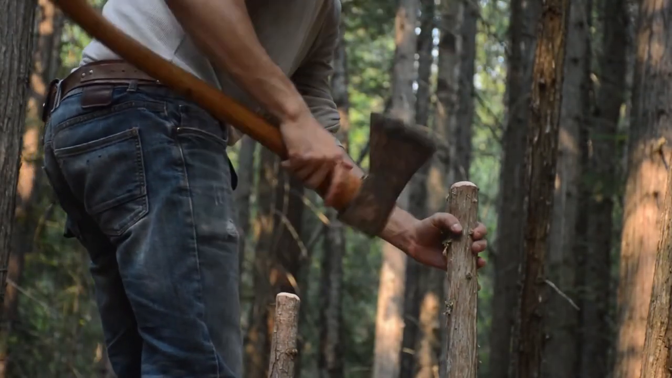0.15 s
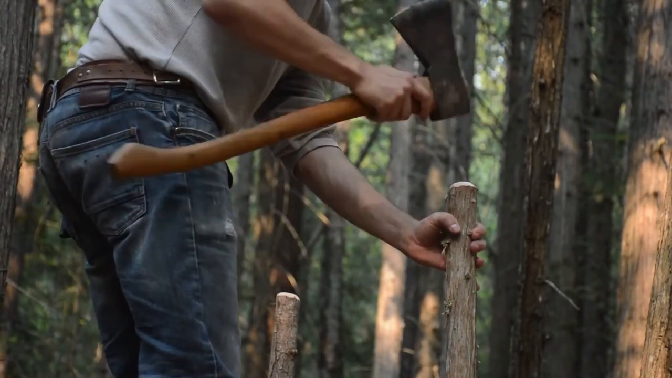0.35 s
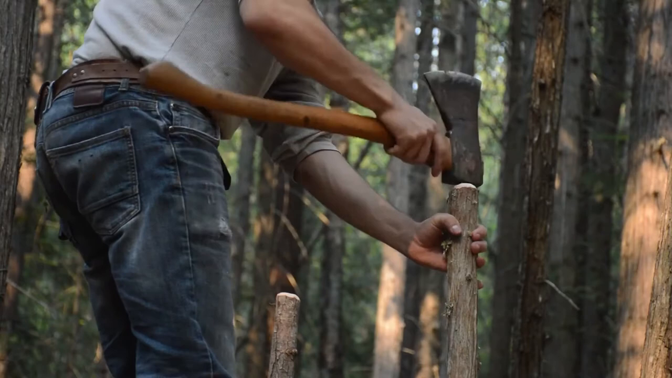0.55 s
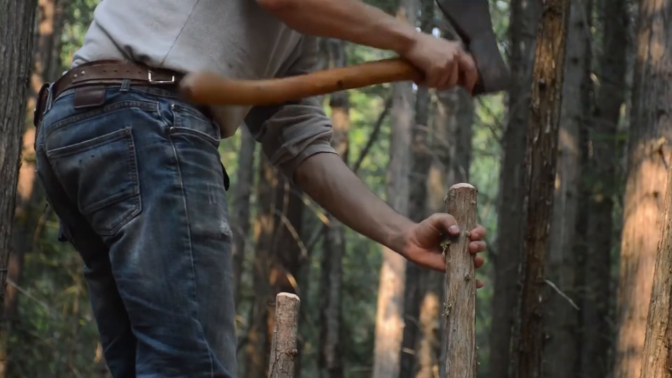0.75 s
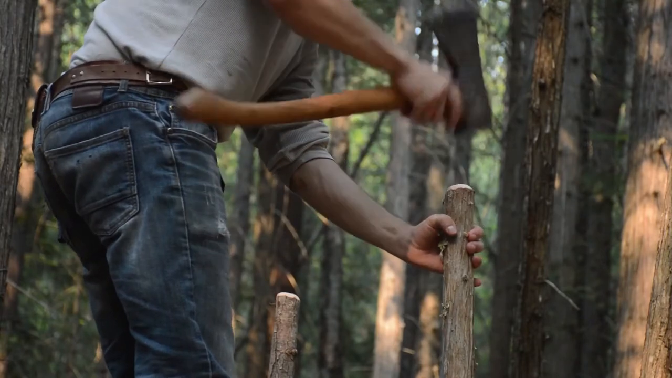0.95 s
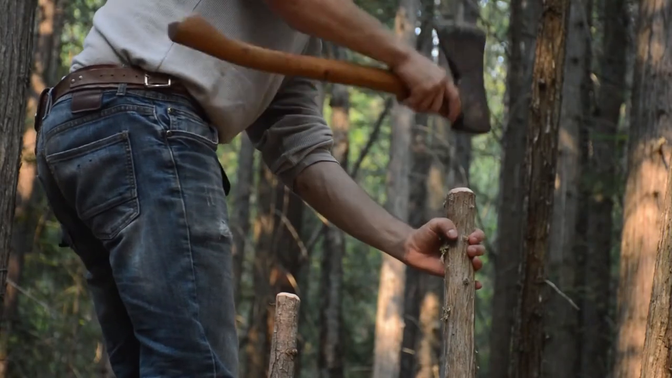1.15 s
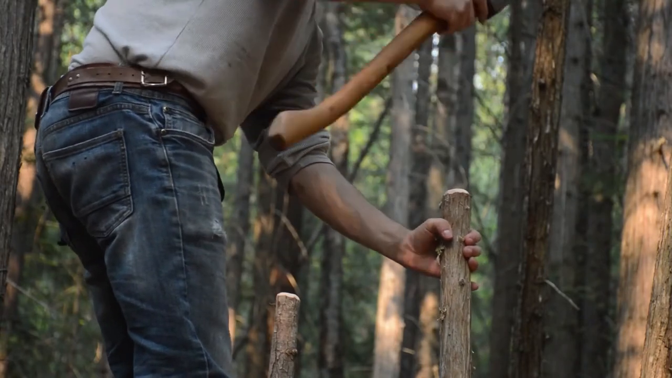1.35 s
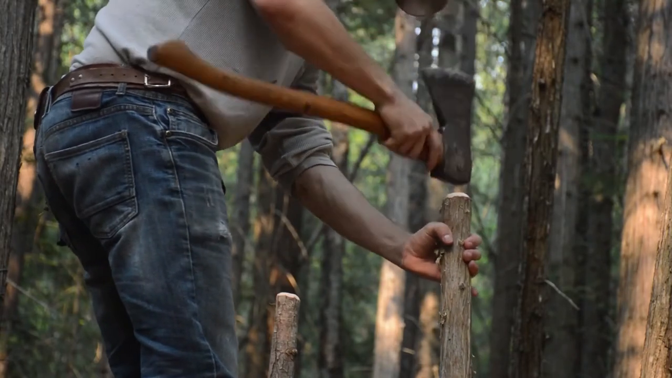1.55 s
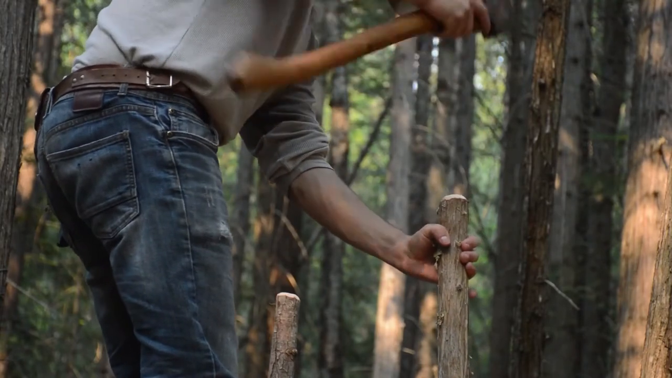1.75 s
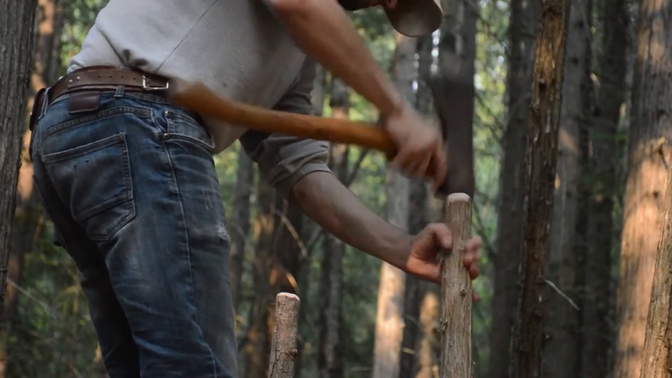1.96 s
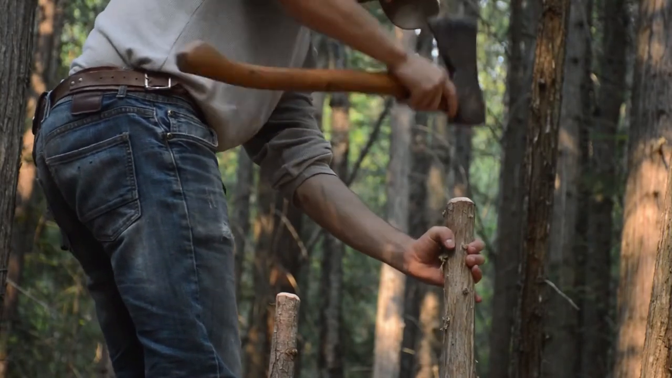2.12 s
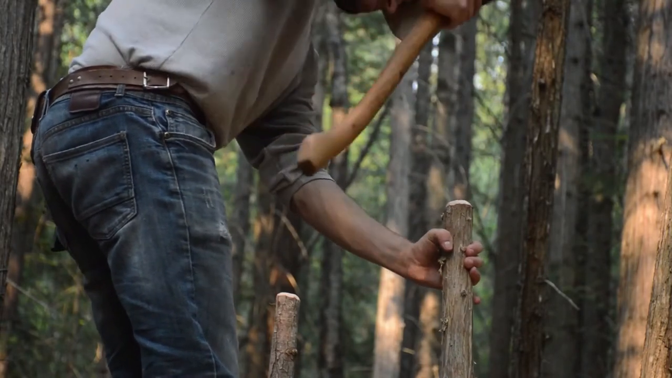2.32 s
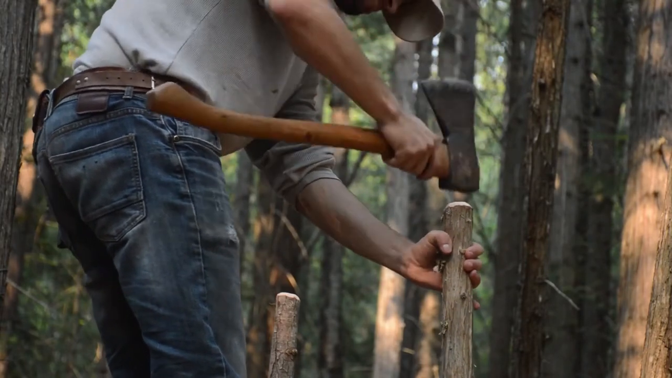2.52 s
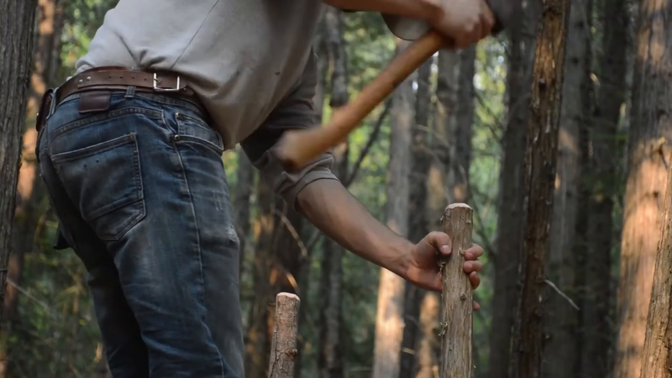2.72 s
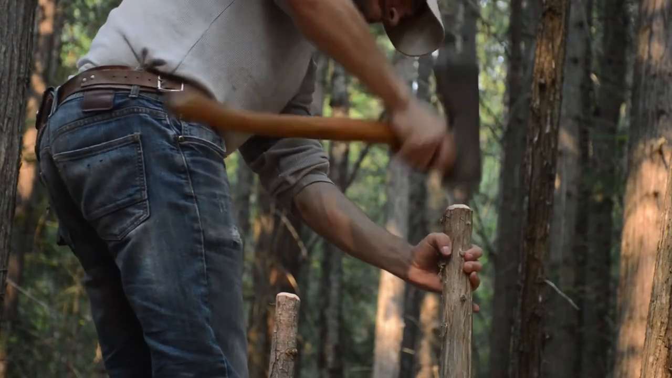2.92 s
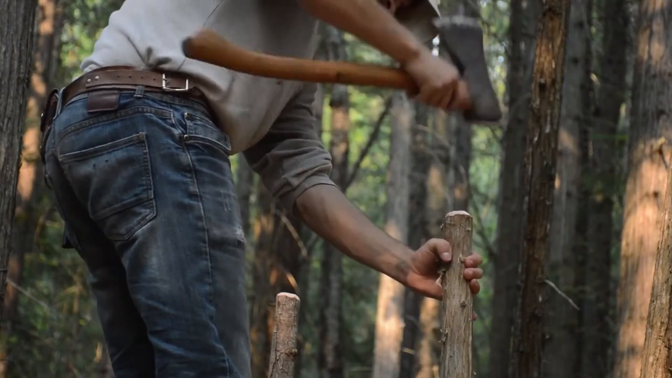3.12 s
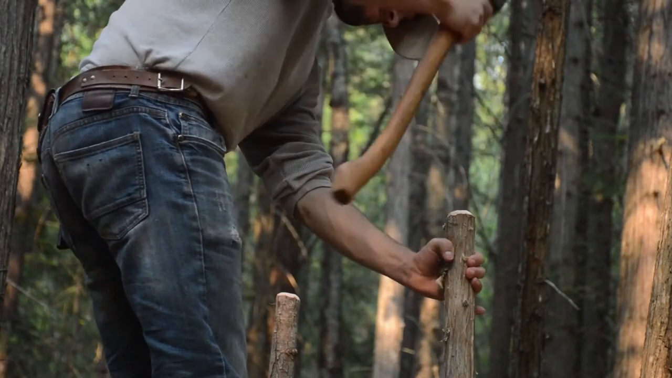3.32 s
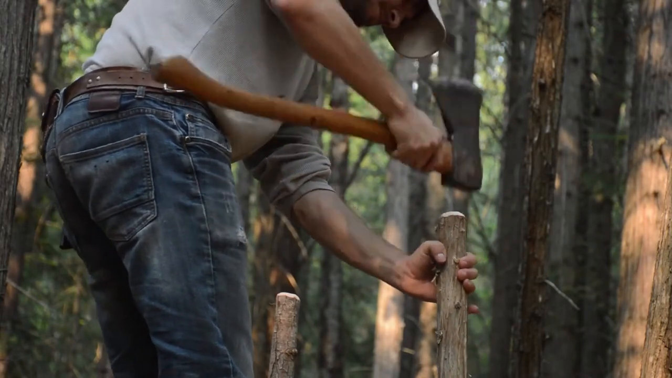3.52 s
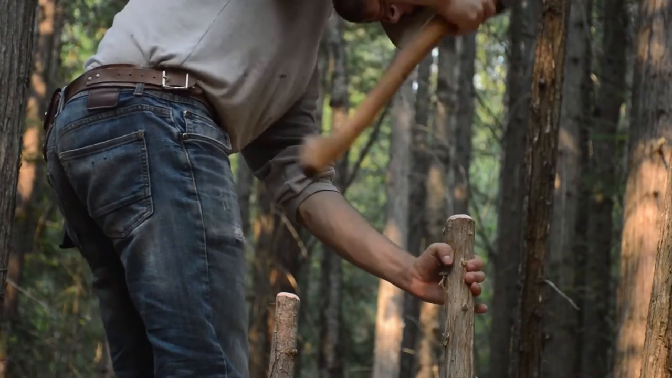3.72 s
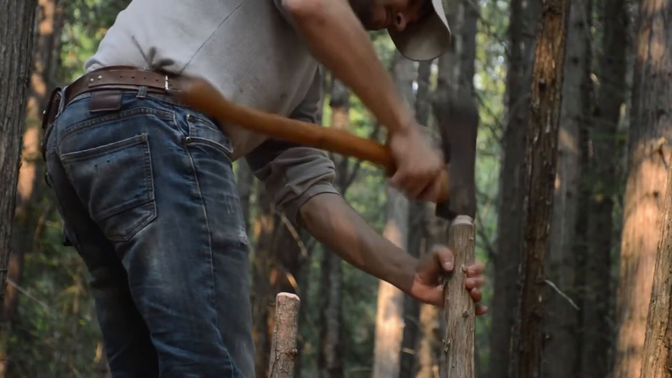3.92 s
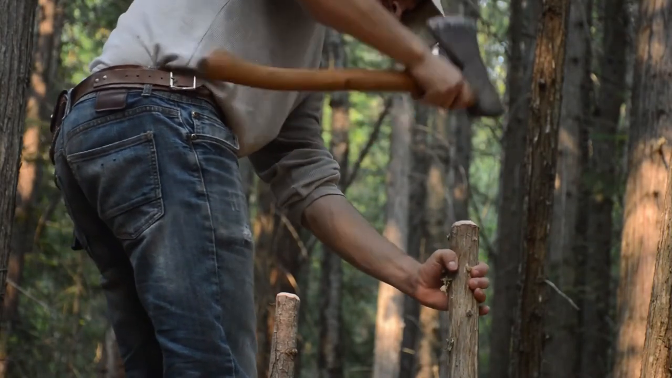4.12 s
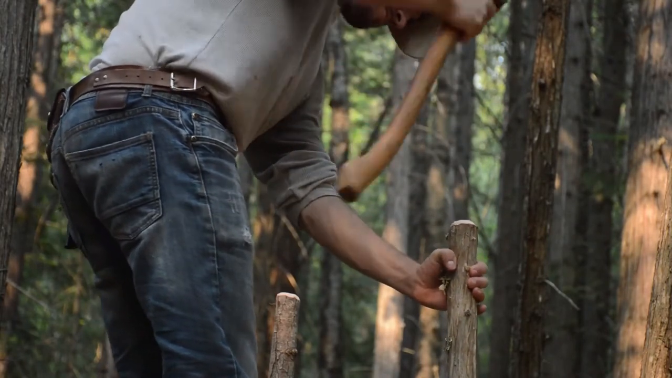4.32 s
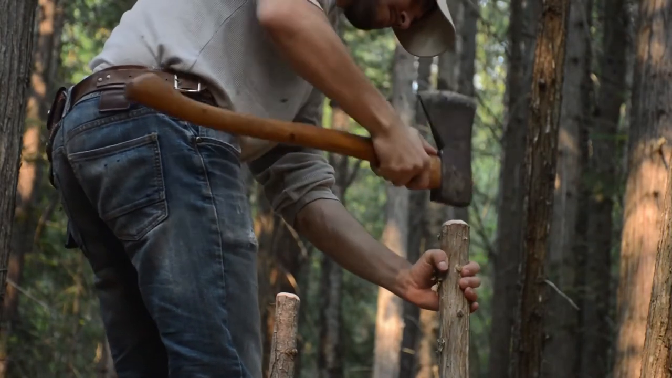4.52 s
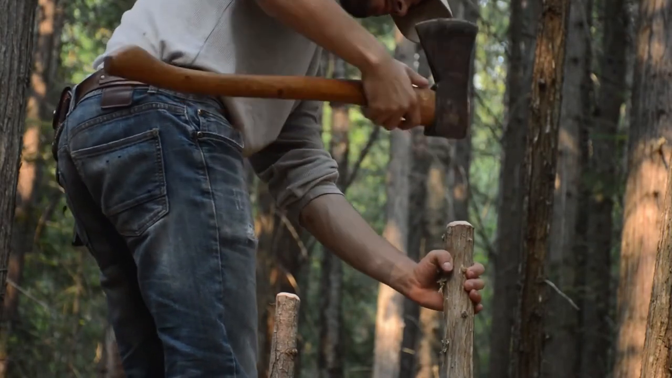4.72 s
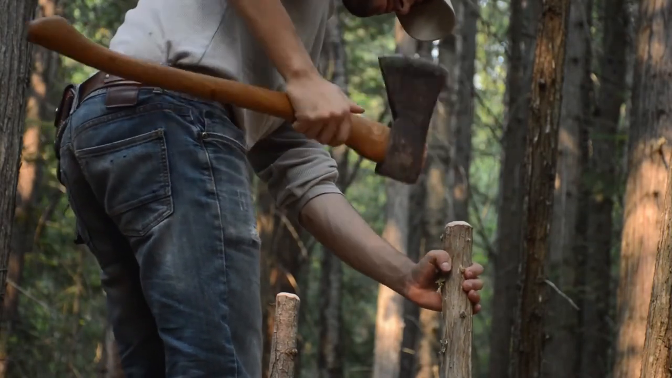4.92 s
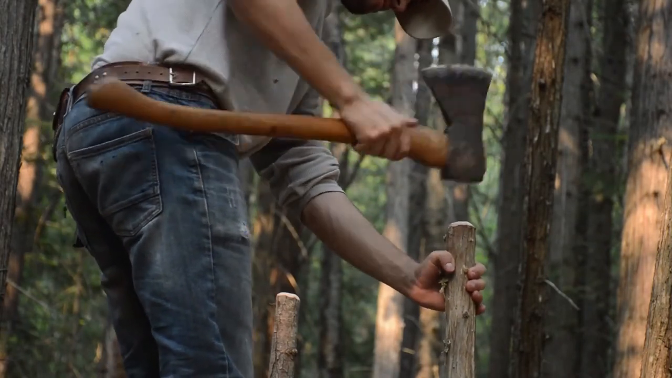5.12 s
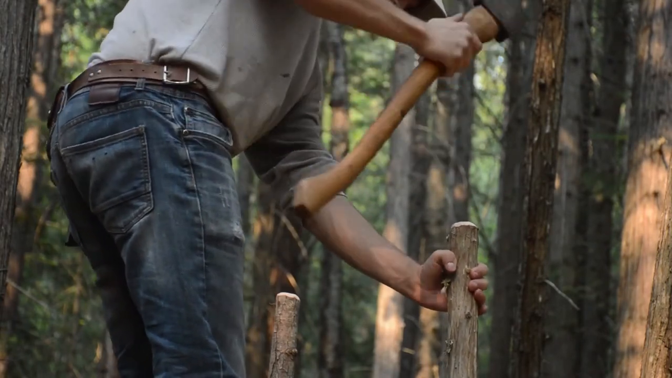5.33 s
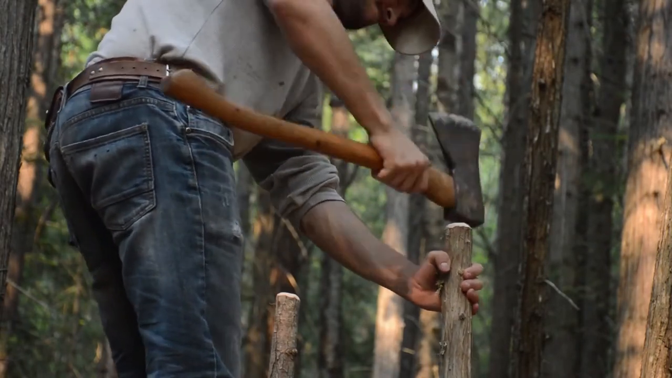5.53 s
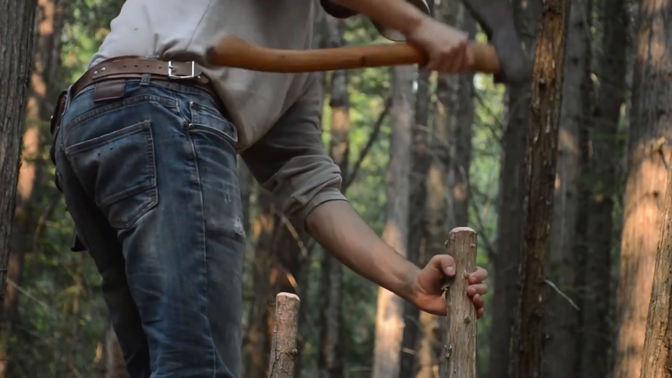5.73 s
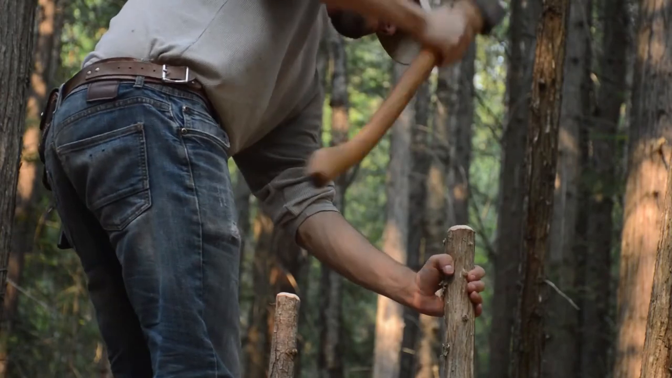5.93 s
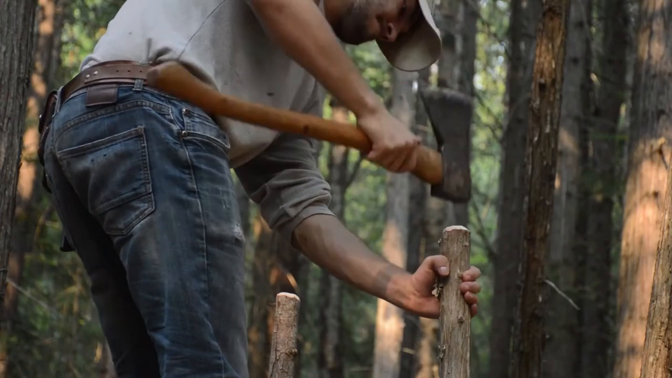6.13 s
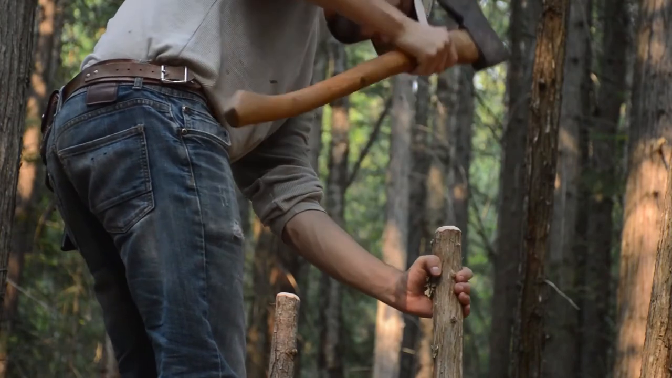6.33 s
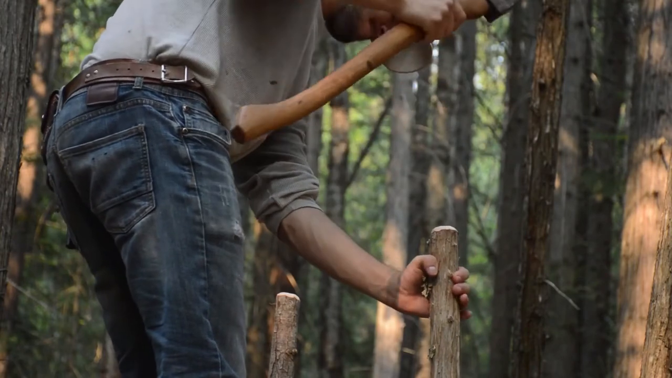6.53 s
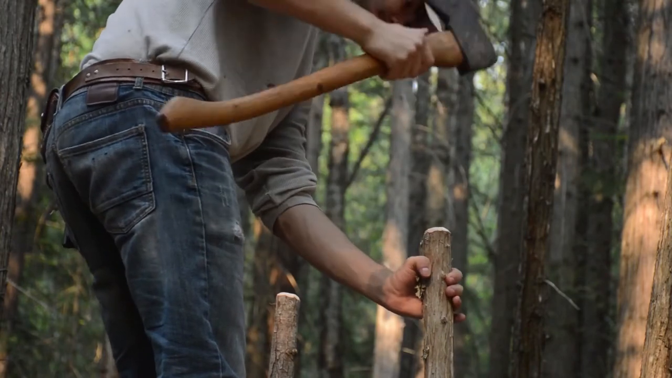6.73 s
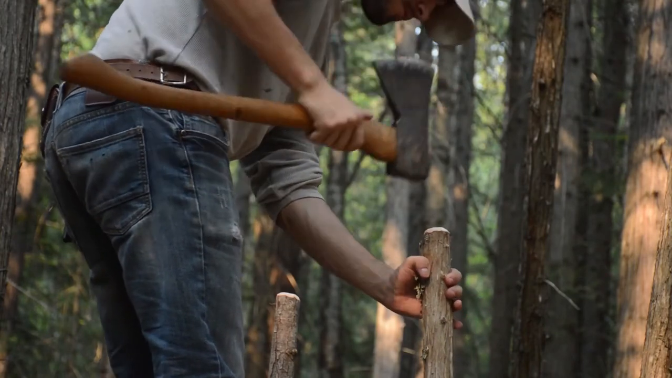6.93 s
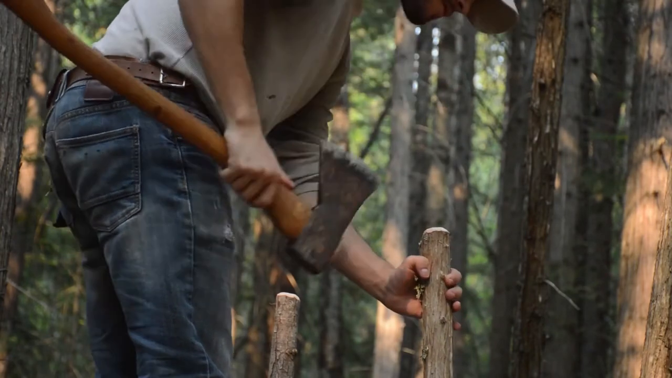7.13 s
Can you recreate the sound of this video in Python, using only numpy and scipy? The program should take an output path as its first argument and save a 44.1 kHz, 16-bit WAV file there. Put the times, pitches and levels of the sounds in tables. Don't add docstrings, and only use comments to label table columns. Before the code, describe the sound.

Close, overloaded woody whacks of axe steel on a stake, about two per second, a brief pause with light clicks, then two more blows.

```python
import sys
import numpy as np
from scipy import signal
from scipy.fft import rfft, irfft
from scipy.io import wavfile
from scipy.ndimage import map_coordinates

SR = 44100
rng = np.random.default_rng(int(sys.argv[2]) if len(sys.argv) > 2 else 0)


def inscribe(sig):
    pcm = np.round(np.clip(np.atleast_2d(sig).T, -1, 1) * 32767)
    wavfile.write(sys.argv[1], SR, pcm.astype(np.int16))


def volts_from_decibels(level):
    exponent = np.asarray(level, float) / 20
    return 10 ** exponent


N = 315756
T = np.arange(SR) / SR

# start_s, force_db, crack_db, soil_push_db, bark_wash_db
BLOWS = [(0.61, -2.5, -14, -9, -13), (1.0827, 3.5, -9.5, -5, -9), (1.572, 4.5, -0.5, 0, -2),
         (2.0551, 1, -1.5, 4.5, -6), (2.5301, 2.5, -5, -3.5, -5.5), (3.0307, 3.5, 0.5, 3, 0),
         (3.5271, 3, -3.5, -2.5, -3.5), (4.0228, 6, -7.5, 1.5, -3), (4.5394, 0.5, -4, 5, -4),
         (5.5900, 1.5, -1.5, 3.5, -1), (6.1134, 3.5, -2, -11, 3)]
# off_centre_db, hardness_db, loose_grip_db, forest_ring_db
LANDING = [(10, -5.5, -1.7, 1), (-0.5, -4.5, 0.1, 1), (-2, 1, 3.2, 0.5), (1.5, 0.7, 3.5, 4),
           (2.5, -0.5, 5.5, 3), (-16.5, -1, 1, 4), (0.5, -.4, 0, 4), (-9, -0.75, -2, 1.5),
           (5, 3, -1.5, 0.8), (5, 2.5, -1, -2), (-5, -17, 1.5, 2)]
# rebound_start_s, chirp_peak_db, rebound_db, wash_tilt_db_per_octave
REBOUND = [(0.619, -5.5, -5, -1.5), (1.095, -0.5, -14, -1), (1.5849, -23.5, -25.5, -0.5),
           (2.0658, -25, -17, -1.3), (2.541, -25, -18, -1.5), (3.042, -26.5, -25.5, -.3),
           (3.5388, -12, -16, -1.7), (4.034, -20, -16.5, -2.1), (4.5513, -26, -15.5, -1),
           (5.6022, -18.5, -20, 0.3), (6.124, -21, -22, 2.1)]
# struck_spot_0_to_1, ring_db, sing_db, sing_t60_s, first_null_s
HEAD = [(.79, -6.5, -59, 0.54, .26), (.87, 2.5, -45, 0.9, 0.19), (.33, -10, -40, 1.26, .17),
        (.47, 8.5, -34.5, 1.03, 0.175), (.25, -1, -45.5, .9, 0.18), (.61, 3, -35, 1.03, 0.24),
        (.08, 6, -37, 1.04, 0.24), (.39, -1, -47.5, 1, 0.19), (.86, -6, -35.5, 1.04, 0.32),
        (.36, 3, -31.5, 1.37, 0.218), (.49, 11, -32, 1.13, 0.268)]

STAKE_HZ = [427, 650, 878, 945, 1210, 1420, 1690, 1787, 1975, 2200, 2450, 2690, 4000, 4480]
# level_db, t60_s, off_centre_db_per_db, hardness_db_per_db, loose_grip_db_per_db
STAKE_MODES = [(-19.5, 0.05, 0.88, 0.82, 0.5), (-11, 0.021, 0.58, -0.53, -0.23),
               (-2, 0.035, 0.22, 0.3, 0.38), (-0.5, 0.045, 0.1, -0.04, 0.07),
               (-26.5, 0.0044, 0.55, 5.3, -0.2), (-13.5, 0.026, 0.68, 1.12, -0.15),
               (-11, 0.076, -0.01, 0.3, 0.79), (-3, 0.022, 0.28, 0.67, 0.02),
               (-8.5, 0.025, 0.04, 0.9, -0.06), (-11, 0.031, 0.63, 1.26, 0.14),
               (-16, 0.02, -0.74, 2.3, -0.9), (-4.5, 0.012, 0.22, 1.77, 0.33),
               (-22.5, 0.026, -0.7, 4.8, -0.9), (-40, 0.029, -0.1, 5.3, 3.5)]
# freq_hz, level_db
CRACK_SPECTRUM = [(150, -4), (400, 0), (1000, -2.5), (2700, 1), (3600, -8), (5000, -13), (8000, -10),
                  (16000, -30)]
# freq_hz, level_db
SNAP_SPECTRUM = [(1500, -28.5), (3500, 6), (5500, -10), (7600, 2), (9000, -3.5), (11500, -9), (16000, -21)]

# freq_hz, level_db
WASH_SPECTRUM = [(200, -24), (600, -7), (1500, 4.5), (2500, -1.5), (4000, -3), (6500, -12.5), (10000, -9),
                 (16000, -41)]
# pitch_hz, width_hz, level_over_wash_db
LENGTHWISE = [(922, 58, 11.5), (1787, 51, 13.5), (2690, 170, 4.5), (4430, 38, -0.5), (5200, 44, 1),
              (6090, 450, 0.5), (7020, 92, -6), (9900, 50, -5)]
# freq_hz, t60_s
TRUNKS_DECAY = [(200, 1.2), (900, 1.234), (1800, 0.99), (3500, 0.91), (6000, 0.66), (10000, 0.49),
                (15000, 0.47)]
# freq_hz, t60_s
NEAR_DECAY = [(300, 0.2), (1000, 0.11), (4000, 0.079), (12000, 0.05)]

STEEL_HZ = [4806, 6350, 9112, 9911]
STEEL_HALF_WAVES = [1, 4, 3, 5]
# level_db, t60_s
STEEL_MODES = [(-30.5, 0.16), (-30.5, 0.15), (-40.5, .1), (-34.5, 0.11)]

# start_s, mode_db, pitch_hz, t60_s, click_db
TICKS = [
    (.151, -64, 8500, .01, -44),
    (5.071, -33, 1500, .02, -29),
    (5.078, -39, 2060, 0.08, -46),
    (5.1388, -28, 1200, 0.011, -44),
    (5.1445, -26, 7000, 0.028, -32),
    (5.1442, -48, 11350, 0.042, -43),
    (5.1460, -52, 7100, 0.3, -16),
    (5.1462, -60, 5500, .02, -34),
    (5.1388, -34, 540, .016, -48),
    (5.1462, -44, 2900, .012, -44),
]
# centre_s, level_db, spread_s
SLEEVE = [
    (4.85, -68, .11),
    (5.13, -59, .05),
]
# freq_hz, density_db_per_hz
HUSH_SPECTRUM = [(15, -51.5), (25, -15.5), (53, 0), (137, -5), (270, -10.5), (775, -8), (3160, -19),
                 (16000, -36)]
ENGINE_HZ = [110, 173, 223, 268]
ENGINE_DB = [-58.5, -66, -73, -67.5]
# time_s, level_db
ENGINE_FADE = [(0, 0.5), (1.499, -2), (4.3, -2), (5.4, -1.5), (7.16, -1.5)]

LEAD_S, CONTACT_S = 0.001027, 0.0035
SNAP_DB_PER_HARDNESS_DB = -0.35
THUD_DB_PER_OFF_CENTRE_DB = -0.26
SING_HZ, SING_SWELL_S = 3589, 0.033
SOIL_MIRROR = 0.52
NODE_LEAK = 0.03
CLICK_OCTAVES, CLICK_NARROWING = 0.99, 0.53


def unit(x):
    return x / np.sqrt(np.mean(x ** 2) + 1e-20)


def along(points, hz):
    f, v = np.transpose(points)
    return np.interp(np.log(hz + 1), np.log(f + 1), v)


def curve(knots_per_s):
    knots = rng.standard_normal(24)
    return map_coordinates(knots, [np.arange(N) * knots_per_s / SR])


def noise(spectrum, size):
    gain = volts_from_decibels(along(spectrum, np.fft.rfftfreq(size, 1 / SR)))
    return unit(irfft(rfft(rng.standard_normal(size)) * gain, size))


def mode(pitch_hz, level_db, t60_s, swell_s):
    decay = volts_from_decibels(level_db - 60 * T / t60_s)
    return decay * np.sin(2 * np.pi * pitch_hz * T) * (1 - np.exp(-T / swell_s))


def tail(decays, rise_s, spectrum=((20, 0), (20000, 0))):
    hz, t, z = signal.stft(noise(spectrum, size=SR), SR, nperseg=256)
    fade = volts_from_decibels(-60 * t / along(decays, hz)[:, None])
    h = signal.istft(z * fade, SR, nperseg=256)[1][:SR]
    h = h * (1 - np.exp(-T / rise_s))
    return h / np.linalg.norm(h)


def add(track, start_s, sound):
    track[round(start_s * SR):][:SR] += sound[:SR]


def stake_wood(off_db, hard_db, grip_db):
    wood = np.zeros(SR)
    for k, (hz, (db, t60_s, bends, brightens, frees)) in enumerate(zip(STAKE_HZ, STAKE_MODES)):
        detune, luck_db = rng.normal(0, 1, 2) * [0.002, 1]
        level_db = db + bends * off_db + brightens * hard_db + frees * grip_db + luck_db
        wood += (-1) ** k * mode(hz * (1 + detune), level_db, t60_s, 0.0003)
    released_s = np.maximum(T - LEAD_S - CONTACT_S, 0)
    return wood * (1 + 0.57 * volts_from_decibels(-60 * released_s / 0.0043))


def fibre_crack(crack_db, hard_db):
    released_s = np.maximum(T - LEAD_S - CONTACT_S, 0)
    crush_env = volts_from_decibels(-60 * released_s / 0.0087) + volts_from_decibels(-18.5 - 60 * T / 0.04)
    crush = volts_from_decibels(crack_db - 6) * noise(CRACK_SPECTRUM, size=SR) * crush_env
    snap_db = crack_db + SNAP_DB_PER_HARDNESS_DB * hard_db + 2
    snap_env = volts_from_decibels(-60 * np.abs(T - LEAD_S) / 0.004) + volts_from_decibels(-24 - 60 * T / 0.056)
    return crush + volts_from_decibels(snap_db) * noise(SNAP_SPECTRUM, size=SR) * snap_env


def soil_push(push_db, off_db):
    thud = mode(246, push_db - 19 + THUD_DB_PER_OFF_CENTRE_DB * off_db, 0.024, 0.00033)
    return thud - mode(110, push_db - 4, 0.013, 0.0013) - mode(36, push_db - 32.5, 0.29, 0.0052)


def knock(landing, crack_db, push_db):
    off_db, hard_db, grip_db = landing
    closing = np.minimum(T / LEAD_S, 1) ** 3
    wood = closing * stake_wood(off_db, hard_db, grip_db)
    crack = closing * fibre_crack(crack_db, hard_db)
    return wood, crack + soil_push(push_db, off_db)


def bark_wash(tilt_db):
    near = volts_from_decibels(8.5) * tail(NEAR_DECAY, 0.0061, WASH_SPECTRUM)
    far = volts_from_decibels(2.5) * tail(TRUNKS_DECAY, 0.007, WASH_SPECTRUM)
    f = np.fft.rfftfreq(2 * SR, 1 / SR)
    series = sum(volts_from_decibels(db) * 1j * f * width_hz / (hz * hz - f * f + 1j * f * width_hz)
                 for hz, width_hz, db in LENGTHWISE)
    tilt = volts_from_decibels(tilt_db * np.log2(np.maximum(f, 1500) / 3000))
    return irfft(rfft(near + far, 2 * SR) * (1 + series) * tilt)


def blows():
    track = np.zeros(N + SR)
    dull_filter = signal.butter(2, 8000, fs=SR, output="sos")
    for blow, (*landing, ring_db), rebound in zip(BLOWS, LANDING, REBOUND):
        start_s, force_db, crack_db, push_db, wash_db = blow
        rebound_s, chirp_db, rebound_db, tilt_db = rebound
        wood, crack = volts_from_decibels(force_db) * np.array(knock(landing, crack_db, push_db))
        add(track, start_s - LEAD_S, wood + crack)
        second_contact = volts_from_decibels(rebound_db) * signal.sosfilt(dull_filter, wood + volts_from_decibels(3.5) * crack)
        add(track, rebound_s, second_contact + mode(7500, chirp_db - 2.5, 0.006, 0.0006))
        trunks = volts_from_decibels(-18) * tail(NEAR_DECAY, 0.0029) + volts_from_decibels(ring_db - 31.5) * tail(TRUNKS_DECAY, 0.022)
        add(track, start_s, signal.fftconvolve(wood, trunks))
        add(track, start_s, volts_from_decibels(wash_db) * bark_wash(tilt_db))
    return track[:N]


def steel_head():
    track = np.zeros(N + SR)
    starts_s = [row[0] for row in BLOWS]
    stops_s = starts_s[1:] + [N / SR]
    for start_s, stop_s, (spot, ring_db, sing_db, sing_t60_s, null_s) in zip(starts_s, stops_s, HEAD):
        ring = np.zeros(SR)
        for hz, half_waves, (db, t60_s) in zip(STEEL_HZ, STEEL_HALF_WAVES, STEEL_MODES):
            reach = abs(np.cos(np.pi * half_waves * spot)) + NODE_LEAK
            ring += reach * mode(hz, db + ring_db, t60_s, 0.003)
        path_rad = np.pi * (T / null_s) ** 2
        beat = np.abs(1 + SOIL_MIRROR * np.exp(1j * path_rad)) / (1 + SOIL_MIRROR)
        sing = np.sqrt(2) * beat * mode(SING_HZ, sing_db, sing_t60_s, SING_SWELL_S)
        add(track, start_s, (ring + sing) * (T < stop_s - start_s))
    return track[:N]


def light_contacts():
    track = np.zeros(N + SR)
    for start_s, db, hz, t60_s, click_db in TICKS:
        width = CLICK_OCTAVES * (1000 / hz) ** CLICK_NARROWING
        colour = [(hz / 8 ** width, -40), (hz / 2 ** width, -6), (hz, 0),
                  (hz * 2 ** width, -6), (hz * 8 ** width, -40)]
        click_env = np.minimum(T / 0.00012, 1) * volts_from_decibels(click_db - 60 * T * hz / 30)
        tick = mode(hz, db, t60_s, 0.00027) + click_env * noise(colour, size=SR)
        add(track, start_s, tick + volts_from_decibels(-10) * signal.fftconvolve(tick, tail(NEAR_DECAY, 0.004))[:SR])
    return track[:N]


def sleeve():
    t = np.arange(N) / SR
    cloth = noise([(2000, -33), (6000, -4), (10000, -1.5), (14000, -14)], size=N)
    return cloth * sum(volts_from_decibels(db) * np.exp(-((t - s) / spread_s) ** 2) for s, db, spread_s in SLEEVE)


def far_engine():
    fade_db = np.interp(np.arange(N) / SR, *np.transpose(ENGINE_FADE))
    drone = np.zeros(N)
    for hz, db in zip(ENGINE_HZ, ENGINE_DB):
        sway_db = 2 * curve(knots_per_s=1.1)
        partial = noise([(hz - 8, -40), (hz - 2, 0), (hz + 2, 0), (hz + 8, -40)], size=N)
        drone += volts_from_decibels(db + fade_db + sway_db) * partial
    return drone


def forest_air():
    return volts_from_decibels(-51) * noise(HUSH_SPECTRUM, size=N)


def scene():
    return (blows() + steel_head() + light_contacts() + sleeve() + far_engine() + forest_air())[None]


def low_pass(x):
    return signal.sosfilt(signal.butter(12, 16450, fs=SR, output="sos"), x)


def record(dry):
    coupled = signal.sosfilt(signal.butter(1, 15, "high", fs=SR, output="sos"), dry)
    clipped = np.clip(coupled, -1, 1)
    limited = signal.sosfiltfilt(signal.butter(8, 15900, fs=SR, output="sos"), clipped)
    return low_pass(limited)


dry = scene()
out = record(dry)
inscribe(out)
```